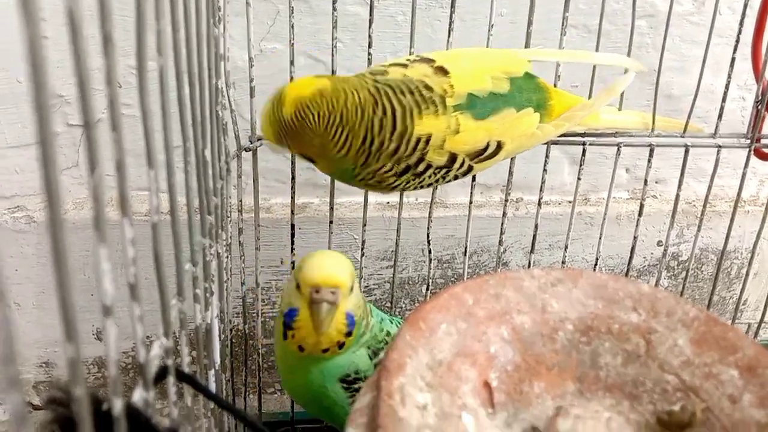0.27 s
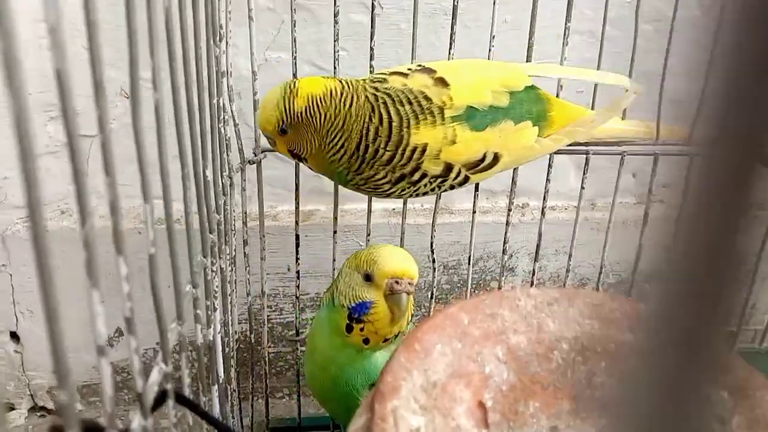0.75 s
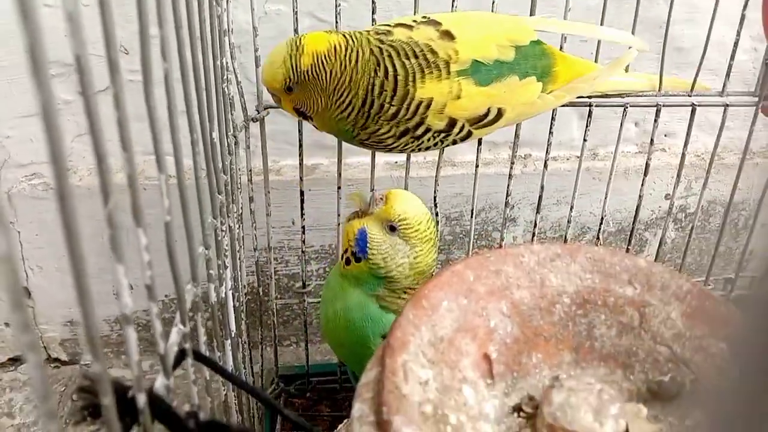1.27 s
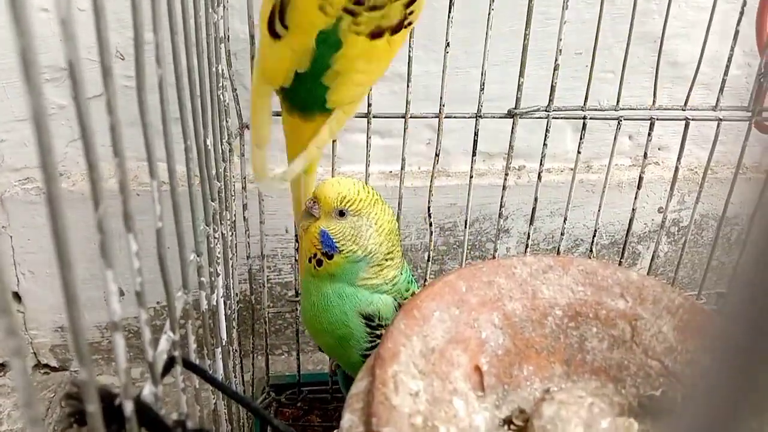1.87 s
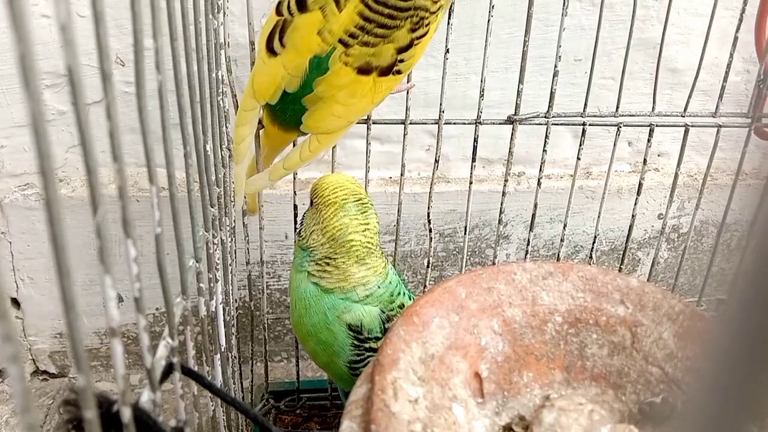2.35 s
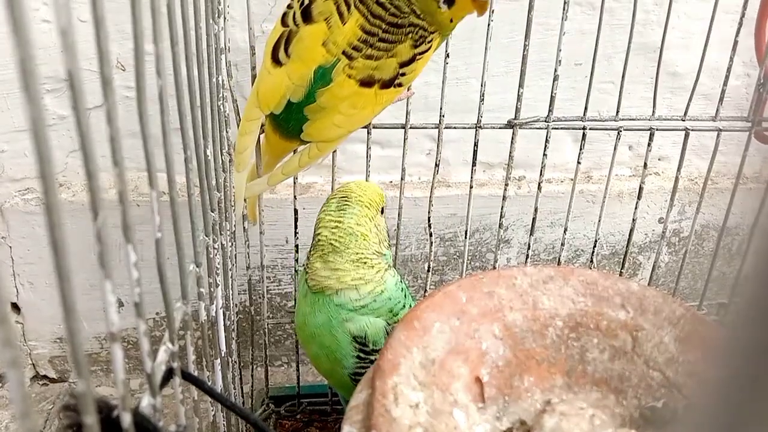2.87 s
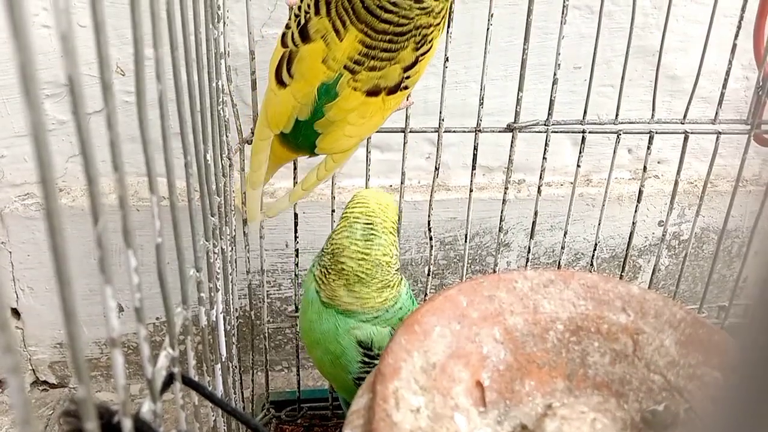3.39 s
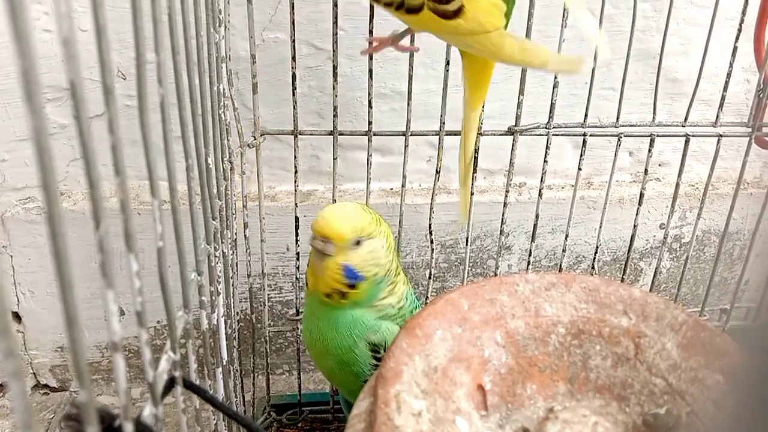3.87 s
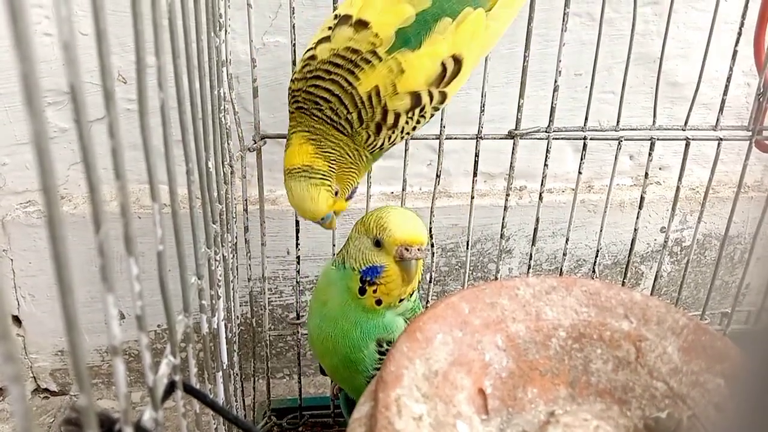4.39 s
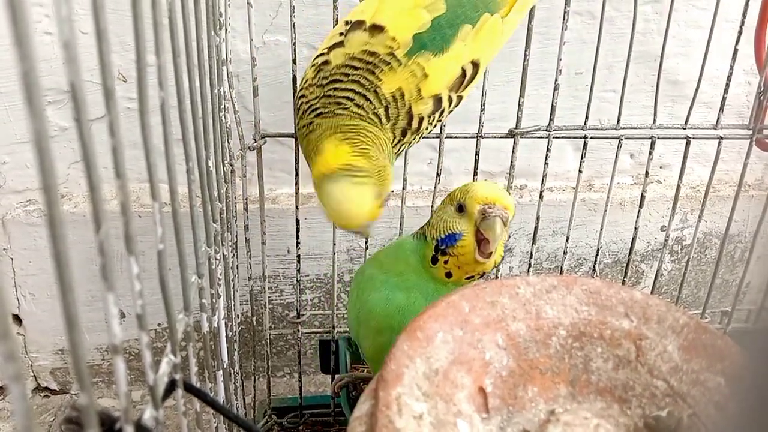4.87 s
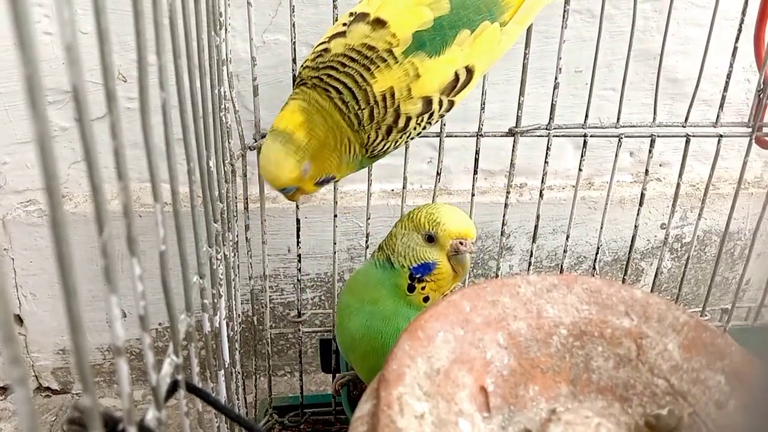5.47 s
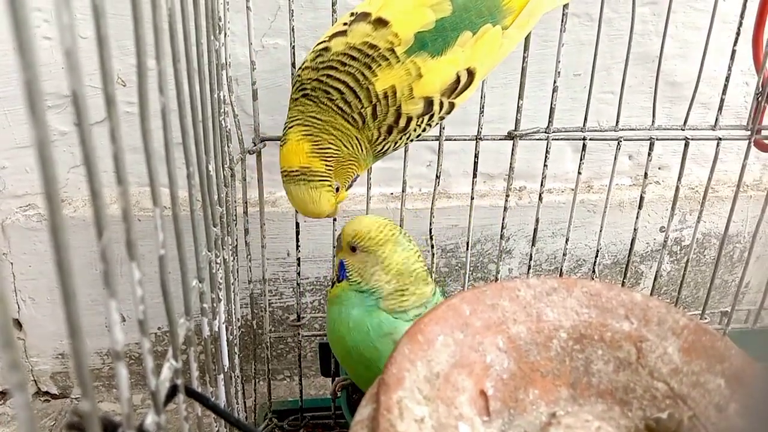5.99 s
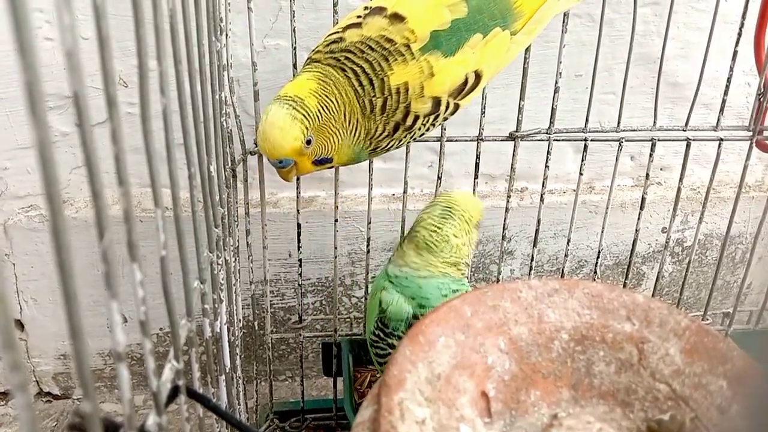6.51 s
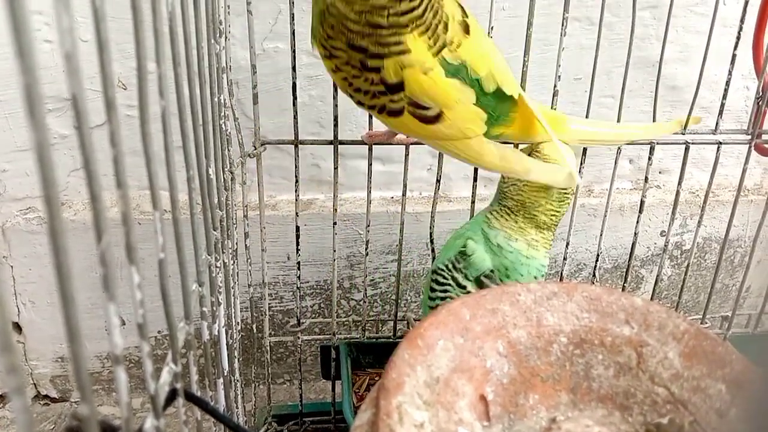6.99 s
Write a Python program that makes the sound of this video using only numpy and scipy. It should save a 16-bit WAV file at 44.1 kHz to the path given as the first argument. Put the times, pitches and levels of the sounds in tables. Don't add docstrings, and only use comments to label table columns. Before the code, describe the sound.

A quiet yard heard by a phone close to a wire cage. A low motor drone hums faintly from the start, dropping in and out behind noise gating. Light claw ticks and slides ring the thin wires at 0-1 s, with a faint falling bird whistle at 0.3. At 1.2 a moderate, rattling crow caw sounds, overlapped at 1.45-1.65 by a rapid, clear swept parrot warble and a sharp claw landing at 1.6. Bright scratching and buzzing follow at 2-2.3, then sparse taps until 3.2. A far caw comes at 3.5, with claw clicks at 3.7-3.9. From 4.4 distant caws overlap a faint two-tone horn, returning until 5.9; a beak grinds along a wire at 4.7. Two loud, hoarse caws burst out at 5.4 and 6.1, a softer one between. A hard metallic claw snap lands at 6.4, and scraping builds to a busy scramble at 6.9-7.2.

```python
import sys
import numpy as np
from scipy import signal
from scipy.fft import rfft, irfft
from scipy.io import wavfile
from scipy.ndimage import uniform_filter1d

SR = 44100
rng = np.random.default_rng(int(sys.argv[2]) if len(sys.argv) > 2 else 0)


def volts_from_decibels(level):
    exponent = np.asarray(level, float) / 20
    return 10 ** exponent


def master_out(mix):
    frames = np.transpose(np.atleast_2d(mix))
    ceiling = np.clip(frames, -1, 1)
    pcm = np.round(ceiling * 32767).astype(np.int16)
    wavfile.write(sys.argv[1], SR, pcm)


N = 319725

# (t/s, level/dB)
DRONE_LEVEL = [(0, -55), (.8, -54.5), (1.29, -62), (1.41, -81.5), (1.55, -57), (1.68, -63), (1.82, -81),
               (2.6, -86), (2.71, -64.5), (2.87, -89.5), (2.97, -64), (3.8, -59), (4.22, -70), (4.42, -65),
               (4.62, -83), (4.76, -65.5), (5.01, -81.5), (7.25, -82)]
# (t/s, f/Hz)
DRONE_PITCH = [(0, 86.5), (3, 82.94), (7.25, 79)]
# (f/Hz, density/dB per Hz)
STREET_SPECTRUM = [(140, -36.5), (240, -34.5), (347, 5.5), (372, -9.5), (598, -5), (1420, 7), (2480, -4.5),
                   (3120, -5), (4060, -13.5), (5480, -13), (8060, -29.5), (11700, -23.5), (16000, -38)]
DRONE_MEAN_DB, RUMBLE_DB, STREET_DB = -60.5, -71.5, -72.5
RUMBLE_FOLLOWS, STREET_FOLLOWS = 0.17, 0.22
WHINE_HZ, WHINE_DB = 343, -85.5
GATE_OPENS_DB, GATE_S = -60.5, 0.29
DRONE_LIFT, RUMBLE_LIFT, STREET_LIFT = 0.3, 0.28, 0.28

# (t/s, duration/s, long wires/dB, short wires/dB, hiss/dB)
LANDINGS = [(0.014, 0.21, -67.5, -67, -78), (0.135, 0.15, -63, -59, -92), (1.156, 0.35, -78, -70.5, -71),
            (1.603, 0.1, -45.5, -42, -52.5), (1.8, 0.099, -93, -70, -77), (1.957, 0.32, -66, -61.5, -64),
            (2.227, 0.18, -68, -64, -70), (3.655, 0.11, -61, -55, -67), (4.026, 0.085, -71, -69.5, -65.5),
            (4.484, 0.27, -67.5, -64, -90), (6.377, 0.16, -46.5, -59.5, -66.5), (7.138, 0.1, -66, -57, -65),
            (2.963, 0.087, -70, -64.5, -82), (3.145, 0.082, -76, -87, -99), (0.353, .05, -85, -84, -76),
            (0.448, 0.064, -82, -78, -82), (3.827, 0.11, -62.5, -59.5, -68),
            (3.909, 0.066, -79, -57.5, -66)]
# (t/s, duration/s, long wires/dB, short wires/dB, hiss/dB)
SHUFFLES = [
    (0.75, 0.43, -70.5, -66, -81),
    (0.914, 0.17, -64.5, -60, -66),
    (2.82, 0.14, -73, -67.5, -72),
    (2.66, 0.19, -81, -85, -94.5),
    (1.212, 0.16, -70, -62.5, -79),
    (4.679, 0.25, -52.5, -57, -78),
    (6.642, 0.22, -64, -70.5, -100),
    (6.851, 0.28, -55.5, -56, -61.5),
    (7.163, .2, -45, -50.5, -56),
]
# (t/s, hiss peak/dB, wire level/dB, strongest wire f/Hz)
TICKS = [(0.022, -53, -71, 5680), (0.138, -79.5, -56.5, 3500), (0.1532, -51, -54, 2000),
         (.2404, -66, -83, 1420), (0.637, -69, -57.5, 4950), (0.962, -64, -67, 1440),
         (1.1638, -65, -70, 3100), (1.4437, -82, -57.5, 1620), (1.612, -60, -49, 3070),
         (1.8088, -65, -64.5, 1930), (1.958, -48, -72, 5900), (1.9827, -46, -58, 3560),
         (2.041, -47.5, -64, 3800), (2.226, -43, -78, 6380), (2.878, -60, -83, 3180),
         (2.967, -70.5, -61, 4730), (3.662, -60, -61, 1460), (3.6834, -61, -47, 1420),
         (3.847, -60, -63, 6430), (3.918, -60, -58.5, 3130), (4.495, -80.5, -58, 2260),
         (4.7106, -57, -45, 5140), (6.398, -47, -39, 2000), (6.3986, -70, -40, 3600),
         (6.65, -73, -68, 3740), (0.082, -70, -60.5, 6400), (.532, -70, -75.5, 5500),
         (2.995, -71, -65, 5360), (3.154, -80, -76.5, 5000), (3.677, -62, -50.5, 5900),
         (3.7, -66, -58, 4500), (7.224, -55, -51.5, 5490), (7.245, -53, -57, 5000), (1.973, -58, -62, 3320),
         (3.531, -80, -68, 1600), (3.833, -64, -61, 5400), (4.604, -80, -69, 3330), (4.622, -80, -66, 3500),
         (4.694, -80, -61, 3260), (4.492, -80, -54, 2500), (4.4935, -80, -64, 5500),
         (4.778, -73, -60, 3180), (5.11, -85, -72, 5500), (5.335, -85, -66, 4500),
         (4.951, -80, -65.5, 3700), (6.9297, -52, -50, 5130), (6.967, -52, -85, 3580),
         (7.008, -49, -54, 3400), (7.054, -61.5, -62, 5260), (7.1519, -46.5, -44.5, 5670),
         (7.198, -48, -45, 2210)]
# (f/Hz, level/dB, t60/s)
WIRE_MODES = [(833, -7, 0.038), (1258, 12.5, 0.037), (1600, 13.5, 0.039), (2000, 9.5, 0.016),
              (2680, 1, 0.011), (2593, -4.5, 0.043), (2672, -8.5, 0.097), (3150, 6, 0.035),
              (3453, 4.5, 0.03), (3703, 10.5, 0.011), (5000, -2.5, 0.02), (5414, 7.5, 0.017),
              (5680, 13, 0.0096), (6560, -2, 0.0201)]
# (f/Hz, density/dB per Hz)
HISS_SPECTRUM = [(4120, -21.5), (7000, -6.5), (7880, -31), (8570, -21.5), (9300, -17.5), (11900, -3.5),
                 (14900, 1.5), (15700, -2)]
LAND_RISE_S, SLIDE_LOSS_DB, SLIDE_HISS_LOSS_DB = 0.018, -26, -27.5
SWELL_S, SWELL_DB = 0.05, -18
CLICK_DB = -15
TAP_LOW_HZ = 950

# (t/s, duration/s, f/Hz)
RASPS = [(.022, .09, 5700), (.025, .1, 3150), (.03, .08, 4900), (.138, .08, 1900), (.155, .06, 1450),
         (.228, .035, 6500), (.45, .06, 5100), (.637, .05, 5700), (1.953, .06, 8550), (1.954, .014, 5900),
         (1.972, .23, 3300), (2.05, .1, 4850), (2.09, .06, 7400), (2.15, .055, 2400), (2.228, .08, 6300),
         (2.245, .1, 3800), (2.25, .08, 5400), (2.29, .08, 3200), (2.678, .05, 1000), (2.735, .05, 2800),
         (2.843, .12, 6400), (2.845, .11, 3150), (2.963, .07, 5250), (2.993, .05, 3400), (2.994, .03, 1400),
         (3.152, .15, 5600), (3.66, .03, 6000), (3.68, .07, 3150), (3.72, .07, 1850), (3.843, .03, 6500),
         (4.18, .07, 5500), (4.49, .1, 2400), (4.69, .08, 3200), (4.775, .13, 3150), (5.26, .12, 2420),
         (6.308, .02, 1130), (6.395, .05, 9700), (6.396, .03, 1350), (6.396, .06, 3000), (6.65, .1, 5500),
         (6.66, .04, 1600), (6.79, .03, 5800), (6.86, .05, 5900), (6.97, .14, 1400), (7.152, .03, 5300),
         (7.17, .08, 1900), (7.22, .03, 3200)]
RASP_DB = [-80, -75, -84, -70, -69, -82, -79, -81, -76, -69, -71, -74.5, -80, -80.5, -68.5, -77.5, -77,
           -75.5, -77.5, -79.5, -88, -86, -69.5, -72, -76, -94.5, -63, -73.5, -58.5, -63.5, -85, -69, -71,
           -71, -68.5, -35.5, -79, -45.5, -61, -86, -70, -77, -73.5, -70.5, -60, -67, -58]
# (t/s, duration/s, f/Hz)
KNOCKS = [
    (1.83, .07, 150),
    (2.22, .15, 900),
    (2.28, .12, 140),
    (2.93, .07, 160),
    (3.7, .1, 350),
    (6.2, .2, 450),
    (6.33, .12, 650),
]
KNOCK_DB = [-71.5, -81, -64.5, -68, -73, -70, -68]
RASP_WIDTH = 0.022

# (t/s, duration/s, start f/Hz, end f/Hz,
# level/dB)
FAR_NOTES = [(0.3, 0.135, 3500, 2600, -70.5), (1.17, 0.07, 3000, 3200, -69), (1.2, 0.113, 630, 590, -73),
             (3.161, 0.13, 620, 600, -77), (1.463, .03, 1260, 1310, -58), (2.45, 0.11, 3200, 3150, -86.5),
             (2.6, 0.057, 3400, 3680, -85.5), (4.1, 0.061, 2650, 2650, -80.5), (4, 0.108, 1474, 1394, -77),
             (6.785, 0.099, 2960, 3120, -75), (6.788, 0.068, 3100, 3260, -68.5),
             (7.008, 0.065, 990, 688, -73.5), (1.691, 0.24, 5730, 5670, -85.5),
             (3.907, 0.02, 3170, 3210, -66), (5.6, 0.14, 2600, 1600, -76.5)]

# (t/s, duration/s, top f/Hz, end sag/0-1, strongest partial/dB)
CAWS = [(1.17, 0.335, 465.6, 0.15, -55), (3.472, 0.41, 503.7, 0.1, -71.5), (4.413, 0.23, 499, 0.02, -78),
        (4.611, 0.353, 527.4, 0.04, -81.5), (4.839, 0.24, 402.3, 0.2, -59.5),
        (5.1, 0.33, 415.7, 0.18, -62.5), (5.419, 0.3, 511.1, 0.29, -23), (5.737, 0.24, 488.4, 0.2, -59),
        (6.09, 0.31, 486.4, .2, -22.5), (4.497, 0.24, 397, 0.2, -72), (5.007, 0.16, 390, 0.01, -61)]
# (second partial below strongest/dB rel, next below/dB rel, beak/dB rel)
THROATS = [(-29, 4, -31), (1, 17.5, -31), (-2, 9, -26), (10, 18, -29), (-42, -15, -24), (-22.5, -0.5, -19),
           (-15.5, -6.5, -14.5), (-12.5, 0.5, -21), (-17.5, -7.5, -16), (-27, -0.5, -14), (-31, -15.5, -23)]
MANNERS = [(4, .2, .07), (4, .3, .15), (4, .2, .15), (4, .2, .2), (5, .3, .14), (5, .3, .14), (4, .2, .12),
           (4, .2, .1), (4, .13, .11), (4, .2, .2), (4, .2, .2)]
# (place of top/0-1, start drop/share of sag, rattle f/Hz)
ARCHES = [(.47, 0.99, 84), (.34, 0.388, 68), (0.37, 0.38, 68), (0.4, 0.43, 53), (0.03, 0.49, 71),
          (0.5, 0.66, 49), (.42, .4, 72), (0.2, 0.3, 61), (.45, .4, 66), (0, 0.47, 110), (.34, 0.35, 120)]
UPPER_DB = [-14, -5, 0, 0, 6.5, 0, -1.5, -3, 0.5, 1, 1]
RATTLE_BENDS = [.026, .03, .025, .025, .02, .022, .044, .025, .04, .025, .02]
UPPER_PARTIALS_DB = [-16.5, -24.5]
PARTIAL_END_DB = [-7, -12.5, 5, 3.5, 8.5]
# (f/Hz, width/Hz, level/dB)
BEAK = [(2620, 380, 3), (2970, 350, 0), (3500, 900, -7.5), (4183, 270, 2), (4440, 260, 6), (5160, 580, 0),
        (5570, 180, 11), (5955, 560, 1.5), (6700, 430, -14), (7190, 320, -10)]
CAW_ATTACK_S, CAW_ATTACK_BEND, CAW_RELEASE_S, CAW_RELEASE_DB = 0.085, 2.27, 0.08, -24.5
LOW_ATTACK_S, LOW_PARTIALS_LAG = 0.11, 0.82
SAG_BEND, BEAK_LAG = 1.7, 0.9
RATTLE_WANDER, PITCH_JITTER = 0.012, 0.004
LOW_THROB = 0.3
SIDE_HOARSE = 3.0
ONSET_HOARSE, ONSET_S, BREAKUP = 4, 0.075, 5

# (t/s, duration/s, start f/Hz, end f/Hz, level/dB)
WARBLE_NOTES = [(1.463, 0.017, 2450, 2650, -44), (1.463, .016, 3750, 3950, -57),
                (1.476, .009, 3950, 4700, -53), (1.3, .012, 5000, 5250, -61),
                (1.464, .012, 6300, 6400, -66), (1.477, 0.011, 2560, 3520, -43.5),
                (1.52, 0.0055, 3800, 2360, -36), (1.532, 0.004, 3230, 3370, -32),
                (1.537, 0.0099, 5100, 4460, -43.5), (1.542, 0.0208, 3765, 2385, -30.5),
                (1.552, 0.02, 5630, 5060, -42.5), (1.568, 0.014, 1750, 1900, -47.5),
                (1.578, 0.011, 1700, 1550, -42), (1.591, 0.01, 1700, 1630, -50),
                (1.58, 0.015, 3400, 2780, -30), (1.554, .011, 3300, 3200, -44),
                (1.591, 0.0051, 3500, 2500, -38), (1.545, .006, 6700, 6100, -50.5),
                (1.563, .01, 6400, 4100, -47), (1.485, 0.011, 2200, 3400, -56),
                (1.592, 0.0137, 2900, 2250, -42), (1.576, 0.012, 5600, 5530, -50.5),
                (1.589, 0.0127, 5850, 4920, -48), (1.609, 0.021, 2880, 3390, -47.5),
                (1.639, 0.028, 2240, 2576, -42.5), (1.65, .02, 2610, 3540, -41)]
OCTAVE_DB, PURE_ABOVE_HZ, RICHER_DB_PER_OCTAVE = -36, 2400, 41

# (t/s, duration/s, low tone/dB, high tone/dB)
HORN_BLASTS = [
    (4.399, 0.17, -78.5, -81),
    (4.637, .13, -83, -70.5),
    (4.77, .12, -65.5, -63),
    (4.974, 0.198, -68.5, -77.5),
    (5.19, 0.071, -74, -85.5),
    (5.782, .14, -74, -69),
]
HORN_TONES_HZ = [932.5, 1026]
# (t/s, duration/s, first click rate/Hz, last click rate/Hz, level/dB)
GRIND = (4.72, .192, 150, 120, -58)


def rms_one(x):
    return x / np.sqrt(np.mean(x ** 2) + 1e-20)


def in_time(rows):
    s, *columns = np.transpose(rows)
    return [np.interp(np.arange(N) / SR, s, c) for c in columns]


def drift(rate_hz, size=N):
    r = np.exp(-2 * np.pi * rate_hz / SR)
    noise = rng.standard_normal(size + SR)
    return rms_one(signal.lfilter([1], [1, -2 * r, r * r], noise)[SR:])


def band(x, low_hz, high_hz, order=2):
    return signal.sosfilt(signal.butter(order, [low_hz, high_hz], "band", fs=SR, output="sos"), x)


def coloured(x, spectrum):
    hz = np.maximum(np.arange(N // 2 + 1) * SR / N, 1)
    point_hz, point_db = np.array(spectrum).T
    return irfft(rfft(x) * volts_from_decibels(np.interp(np.log(hz), np.log(point_hz), point_db)), N)


def resonances(x, peaks):
    out = 0
    for k, (hz, width_hz, db) in enumerate(peaks):
        r = np.exp(-np.pi * width_hz / SR)
        b = (1 - r * r) / 2 * np.array([1, 0, -1])
        a = [1, -2 * r * np.cos(2 * np.pi * hz / SR), r * r]
        out = out + (-1) ** k * volts_from_decibels(db) * signal.lfilter(b, a, signal.lfilter(b, a, x))
    return out


def evened(x):
    return x / np.sqrt(uniform_filter1d(x ** 2, size=1764) + 1e-12)


def tail(x, t60, wet_db):
    t = np.arange(SR // 2) / SR
    response = rng.standard_normal(len(t)) * volts_from_decibels(-60 * t / t60) * (t > 0.006)
    response = response / np.sqrt(np.sum(response ** 2))
    return x + volts_from_decibels(wet_db) * signal.fftconvolve(x, response)[:N]


def faded(s, length, fade_s):
    cut = slice(round(s * SR), min(N, round((s + length) * SR)))
    t = np.arange(cut.stop - cut.start) / SR
    return cut, t, np.clip(np.minimum(t, length - t) / fade_s, 0, 1)


def whistle(length, start_hz, end_hz, curve):
    x = np.linspace(0, 1, round(length * SR))
    return x, 2 * np.pi * np.cumsum(end_hz + (start_hz - end_hz) * (1 - x) ** curve) / SR


def yard(near):
    drone_db, = in_time(DRONE_LEVEL)
    loud_db = 10 * np.log10(np.abs(uniform_filter1d(near ** 2, round(GATE_S * SR))) + 1e-12)
    opened_db = np.maximum(loud_db - GATE_OPENS_DB, 0)
    swing_db = drone_db - DRONE_MEAN_DB
    drone_db = drone_db + DRONE_LIFT * opened_db * np.clip(-swing_db / 10, 0, 1)
    rumble_db = RUMBLE_DB + RUMBLE_FOLLOWS * swing_db + RUMBLE_LIFT * opened_db
    street_db = np.minimum(STREET_DB + STREET_FOLLOWS * swing_db + STREET_LIFT * opened_db, -67)

    phase = 2 * np.pi * np.cumsum(in_time(DRONE_PITCH)[0] * (1 + 0.03 * drift(2.4))) / SR
    drone = np.sqrt(2) * np.sin(phase) * volts_from_decibels(3.2 * drift(21))
    drone += 0.35 * rms_one(band(rng.standard_normal(N), 49, 56))
    rumble = rms_one(band(rng.standard_normal(N), 115, 191.4))
    whine_phase = 2 * np.pi * WHINE_HZ * np.arange(N) / SR + 0.62 * drift(0.74)
    whine = volts_from_decibels(WHINE_DB) * np.sin(whine_phase)
    street = rms_one(coloured(rng.standard_normal(N), STREET_SPECTRUM)) * volts_from_decibels(0.87 * drift(37))
    steady_street = volts_from_decibels(-88.5) * rms_one(band(street, 300, 700))
    gated = volts_from_decibels(drone_db) * drone + volts_from_decibels(rumble_db) * rumble + volts_from_decibels(street_db - 2.5) * street
    return gated + whine + steady_street


def claw_pressure():
    out = np.zeros((3, N))
    for s, length, *levels_db in LANDINGS:
        cut, t, gate = faded(s, length, 0.0033)
        loss_db = np.outer([SLIDE_LOSS_DB, SLIDE_LOSS_DB, SLIDE_HISS_LOSS_DB], t / length)
        out[:, cut] += gate * np.clip(t / LAND_RISE_S, 0, 1) * volts_from_decibels(np.c_[levels_db] + loss_db)
    for s, length, *levels_db in SHUFFLES:
        cut, t, swell = faded(s, length, SWELL_S)
        out[:, cut] += volts_from_decibels(np.c_[levels_db] + SWELL_DB * (1.5 - swell))
    return out


def wire_ring(grit, at, tap_db, tap_hz):
    taps = np.zeros(N)
    strength_db = rng.normal(0, 3, (len(at), len(WIRE_MODES)))
    dealt = rng.integers(0, 3, N)
    rough = grit * np.abs(grit) ** 0.7
    scraped, tapped = 0, 0
    for k, (hz, db, t60) in enumerate(WIRE_MODES):
        r, w = volts_from_decibels(-60 / (t60 * SR)), 2 * np.pi * hz / SR
        b, a = [0, volts_from_decibels(db) * np.sin(w)], [1, -2 * r * np.cos(w), r * r]
        distance_db = 31.0 * np.abs(np.log2(hz / tap_hz))
        taps[at] = volts_from_decibels(tap_db - 4.0 - 0.55 * db + strength_db[:, k] - distance_db)
        ring = signal.lfilter(b, a, rough * (dealt == k % 3) + 1e-18)
        scraped = scraped + volts_from_decibels(5.5 * drift(9)) * ring
        tapped = tapped + signal.lfilter(b, a, taps + 1e-18)
    return scraped, tapped


def cage():
    sizes = volts_from_decibels(2.0 * np.minimum(rng.exponential(1, N), 4)) * rng.choice([-1, 1], N)
    grit = sizes * (rng.random(N) < 4000 * volts_from_decibels(3 * drift(40)) / SR)
    long_gain, short_gain, hiss_gain = claw_pressure()
    s, snap_db, tap_db, tap_hz = np.transpose(TICKS)
    at = np.round(s * SR).astype(int)
    snaps, clicks = np.zeros((2, N))
    snaps[at], clicks[at] = volts_from_decibels(snap_db), volts_from_decibels(tap_db + CLICK_DB + 19)

    scraped, tapped = wire_ring(grit, at, tap_db, tap_hz)
    scraped = rms_one(scraped) + 0.55 * rms_one(grit)
    wires = long_gain * rms_one(band(scraped, 2070, 5140, order=3))
    wires += short_gain * rms_one(band(scraped, 5040, 6400, order=3))

    edges_hz = np.geomspace(7000, 16500, 7)
    hiss = 0
    for low_hz, high_hz in zip(edges_hz, edges_hz[1:]):
        patches = volts_from_decibels(np.clip(5.0 * drift(48.1), -14, 7))
        hiss = hiss + patches * band(coloured(grit, HISS_SPECTRUM), low_hz, high_hz)

    skid = rng.standard_normal(130) * np.hanning(260)[130:]
    skid = skid / np.sqrt(np.sum(skid ** 2))
    struck = tapped + 2.0 * np.gradient(np.gradient(clicks))
    soft = signal.fftconvolve(struck, skid)[:N]
    crack = signal.fftconvolve(snaps, rng.standard_normal(900) * volts_from_decibels(-np.arange(900) / 16.0))[:N]
    scrape = volts_from_decibels(-2.5) * wires + hiss_gain * rms_one(hiss)
    return scrape + band(soft, TAP_LOW_HZ, 6870, order=4) + coloured(crack, HISS_SPECTRUM)


def rasps():
    out = np.zeros(N)
    for (s, length, hz), db in zip(RASPS + KNOCKS, RASP_DB + KNOCK_DB):
        cut, t, gate = faded(s, length, 0.002)
        width_hz = RASP_WIDTH * hz + 20
        shake = drift(width_hz, len(t)) + 1j * drift(width_hz, len(t))
        level = volts_from_decibels(db - 10.7 * t / length + 3.9 * drift(70, len(t)))
        out[cut] += gate * level * np.real(shake * np.exp(2j * np.pi * hz * t))
    return out


def far_birds():
    out = np.zeros(N)
    for s, length, start_hz, end_hz, db in FAR_NOTES:
        x, phase = whistle(length, start_hz, end_hz, curve=1.4)
        start, size = round(s * SR), len(x)
        note = np.sin(phase + 0.7 * drift(40, size)) * np.sqrt(np.sin(np.pi * x))
        out[start:start + size] += volts_from_decibels(db + 3 * drift(45, size)) * note
    return tail(out, t60=0.22, wet_db=2.0)


def caw_shape(t, length, top_hz, sag, top_at, scoop):
    x = t / length
    rise = scoop * (1 - x / top_at) ** 2 if top_at else 0
    fall = ((x - top_at) / (1 - top_at)).clip(0) ** SAG_BEND
    arch = np.where(x < top_at, rise, fall)
    swell = np.clip(t / CAW_ATTACK_S, 0, 1) ** CAW_ATTACK_BEND
    release_db = CAW_RELEASE_DB * np.clip(1 - (length - t) / CAW_RELEASE_S, 0, 1)
    return top_hz * (1 - sag * arch), swell * volts_from_decibels(release_db)


def caw_voice(t, length, phase, rattle, strongest, hoarse, levels_db):
    size, x = len(t), t / length
    roughness = 1 + BREAKUP * x ** 4 + ONSET_HOARSE * np.clip(1 - t / ONSET_S, 0, 1)
    voice = 0
    for k, db in enumerate(levels_db):
        number = k + strongest - 2
        spread_hz = 38 * number
        side = SIDE_HOARSE if k in (1, 3, 4) else 1
        noise = drift(spread_hz, size) + 1j * drift(spread_hz, size)
        skirt = 1 + hoarse * side * roughness * noise
        level = volts_from_decibels(db + PARTIAL_END_DB[k] * x ** 3)
        level = level * np.clip(t / LOW_ATTACK_S, 0, 1) ** (LOW_PARTIALS_LAG * max(0, strongest - number))
        level = level * (1 + LOW_THROB * (k == 0) * np.cos(rattle))
        voice = voice + level * np.real(skirt * np.exp(1j * number * phase))
    return voice


def capsule_fizz(high):
    peaks = [(8000, 250, 2), (8400, 200, 6), (8850, 250, 4), (10200, 600, 0),   # (f/Hz, width/Hz, level/dB)
             (11000, 500, 2), (11700, 900, -2), (13500, 2500, -8)]
    noise = rms_one(resonances(rng.standard_normal(N), peaks))
    return volts_from_decibels(-31 + 3 * drift(30)) * uniform_filter1d(np.abs(high), size=300) * noise


def crows():
    low, high = np.zeros((2, N))
    for caw, throat, manner, arch, upper_db, swing in zip(CAWS, THROATS, MANNERS, ARCHES, UPPER_DB, RATTLE_BENDS):
        s, length, top_hz, sag, main_db = caw
        second_db, third_db, beak_db = throat
        strongest, depth, hoarse = manner
        top_at, scoop, rattle_hz = arch
        cut, t, gate = faded(s, length, 0.015)
        pitch, effort = caw_shape(t, length, top_hz, sag, top_at, scoop)
        gate = gate * effort
        size = len(gate)

        step_hz = rattle_hz / strongest
        pitch = uniform_filter1d(step_hz * np.round(pitch / step_hz), size=300)
        rattle = 2 * np.pi * np.cumsum(rattle_hz * (1 + RATTLE_WANDER * drift(13.4, size))) / SR
        shake = np.sin(rattle) + 0.3 * np.sin(2 * rattle)
        bend = 1 + PITCH_JITTER * drift(55, size) + swing * (1 + 0.3 * drift(25, size)) * shake
        phase = 2 * np.pi * np.cumsum(pitch * bend) / SR
        throb = 1 + depth * np.cos(rattle)

        levels_db = [second_db, third_db, 0, *np.add(UPPER_PARTIALS_DB, upper_db)]
        voice = caw_voice(t, length, phase, rattle, strongest, hoarse, levels_db)
        pulses = sum(np.cos(k * phase) for k in range(6, 16))
        pulses += rng.standard_normal(size) * (1 + np.cos(phase))
        beak = evened(resonances(throb * pulses, BEAK))
        beak_gate = gate * np.clip(t / CAW_ATTACK_S, 0, 1) ** BEAK_LAG
        low[cut] += gate * volts_from_decibels(main_db) * throb * voice
        high[cut] += beak_gate * volts_from_decibels(main_db + beak_db - 5.0) * beak
    fizz = capsule_fizz(high)
    low = tail(band(low, 790, 3600, order=8), t60=0.36, wet_db=-10)
    return low + tail(band(high, 2300, 6900, order=4), t60=0.25, wet_db=-2.0) + fizz


def warble():
    out = np.zeros(N)
    for s, length, start_hz, end_hz, db in WARBLE_NOTES:
        octave_db = OCTAVE_DB + RICHER_DB_PER_OCTAVE * max(0, np.log2(PURE_ABOVE_HZ / start_hz))
        x, phase = whistle(length, start_hz, end_hz, curve=1.81)
        start, size = round(s * SR), len(x)
        overtones = np.sin(2 * phase) + 0.32 * np.sin(3 * phase)
        overtones += 0.19 * np.sin(4 * phase) + 0.061 * np.sin(5 * phase)
        note = np.sin(phase) + volts_from_decibels(octave_db) * overtones
        swell = np.sin(np.pi * x ** 0.57) ** 1.3
        out[start:start + size] += volts_from_decibels(db + 2.67 * drift(230.0, size)) * note * swell
    return tail(band(out, 790, 7300, order=8), t60=0.12, wet_db=-8.5)


def horn():
    out = np.zeros(N)
    for s, length, *levels_db in HORN_BLASTS:
        cut, t, gate = faded(s, length, 0.02)
        for hz, db in zip(HORN_TONES_HZ, levels_db):
            tone = np.sin(2 * np.pi * hz * t + 0.4 * drift(20, len(t)))
            out[cut] += gate * volts_from_decibels(db + 3 + 3 * drift(35, len(t))) * tone
    return tail(out, t60=0.15, wet_db=-8)


def grind():
    s, length, first_hz, last_hz, db = GRIND
    cut, t, gate = faded(s, length, 0.004)
    rate_hz = first_hz + (last_hz - first_hz) * t / length
    turns = np.cumsum(rate_hz * (1 + 0.12 * drift(30, len(t)))) / SR
    clicks = np.diff(np.floor(turns), prepend=0) > 0
    out = np.zeros(N)
    out[cut] = clicks * volts_from_decibels(db + 20.5 + 3 * rng.standard_normal(len(t))) * gate
    return band(out, 4560, 6800, order=6) + volts_from_decibels(-1) * band(out, 2600, 3600)


def scene():
    self_noise = volts_from_decibels(-94.0) * band(rng.standard_normal(N), 10000, 11000)
    wires = tail(cage() + grind(), t60=0.073, wet_db=-6.5)
    near = wires + far_birds() + crows() + warble() + horn()
    buzzes = tail(rasps(), t60=0.036, wet_db=-5.5)
    return (yard(near) + near + buzzes + self_noise)[None]


def band_limit(x):
    return signal.sosfilt(signal.butter(12, 16780, fs=SR, output="sos"), x)


def record(dry):
    top_cut = signal.cheby2(16, 30, 15900, fs=SR, output="sos")
    mix = signal.sosfilt(top_cut, 0.62 * np.tanh(dry / 0.54))
    return band_limit(mix)


dry = scene()
out = record(dry)
master_out(out)
```